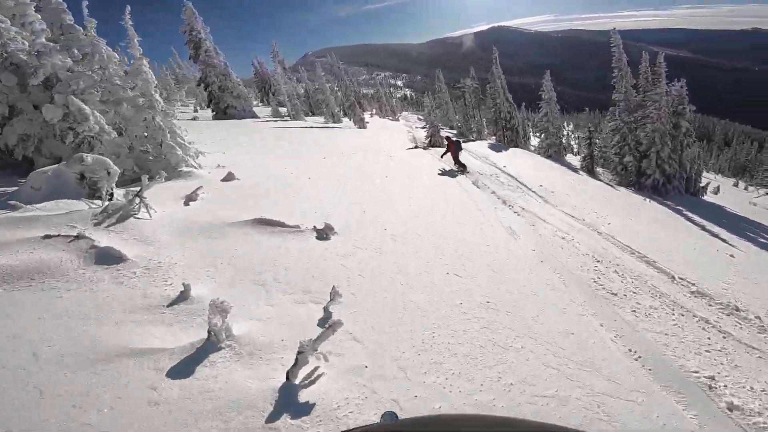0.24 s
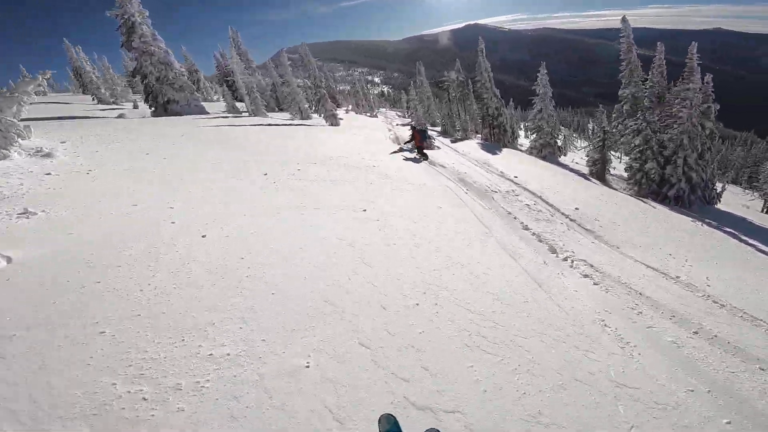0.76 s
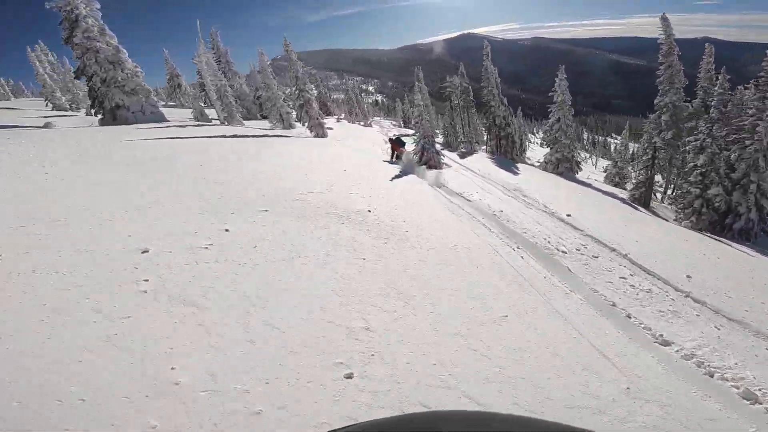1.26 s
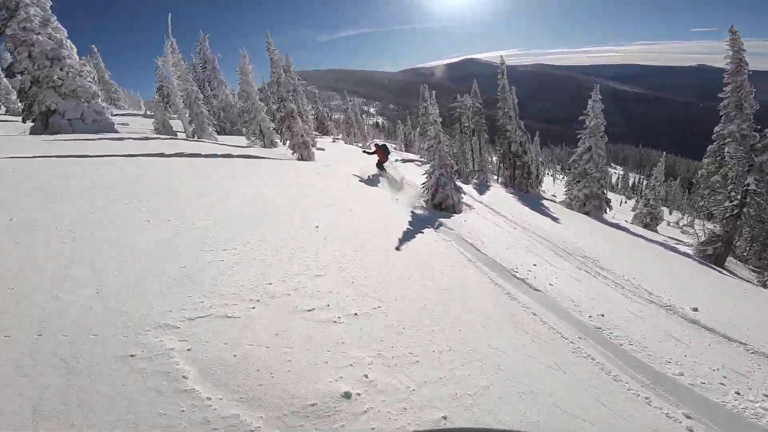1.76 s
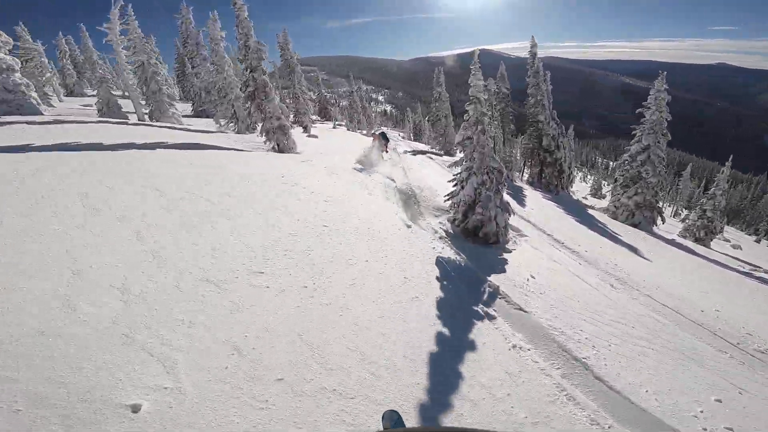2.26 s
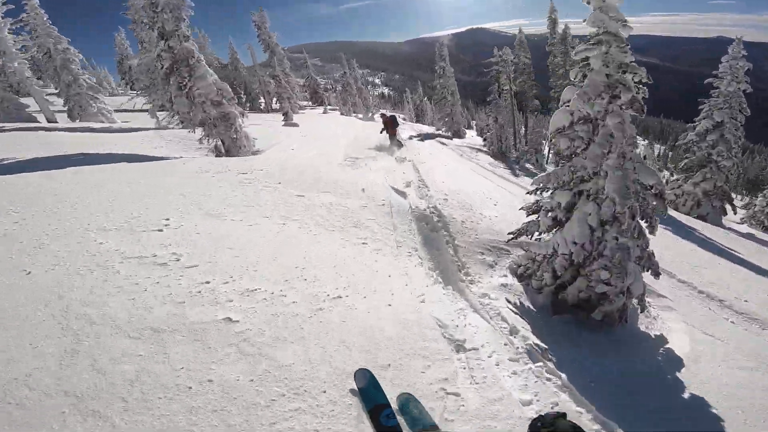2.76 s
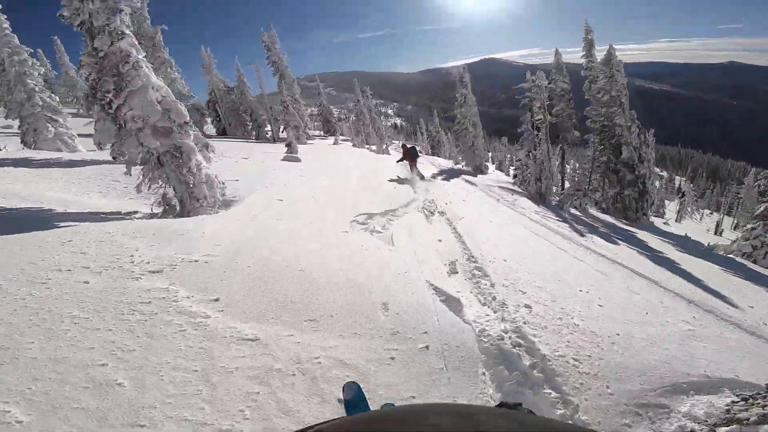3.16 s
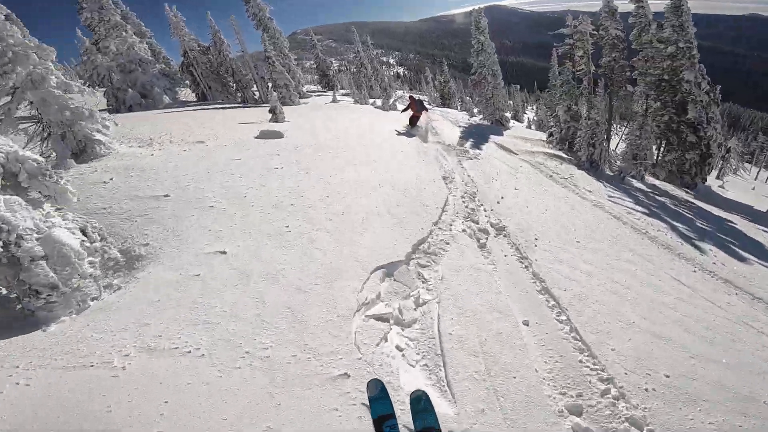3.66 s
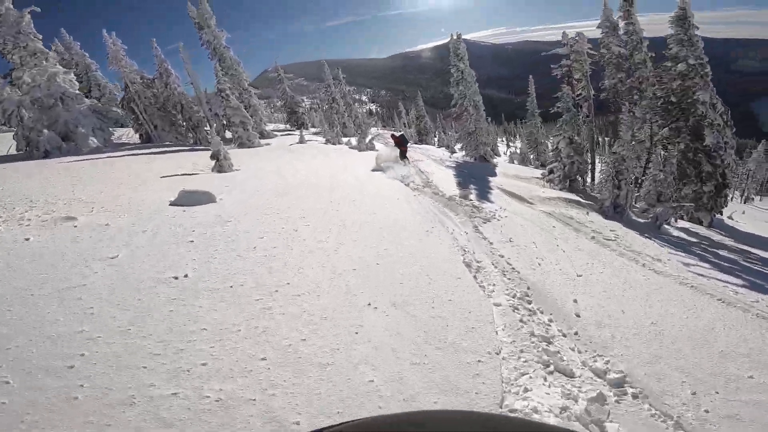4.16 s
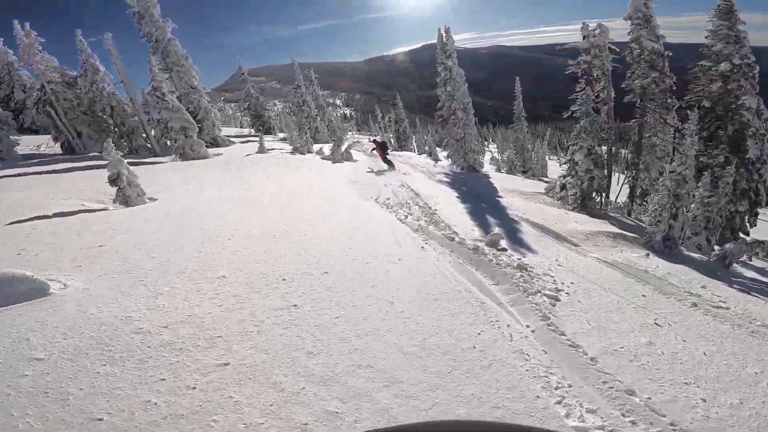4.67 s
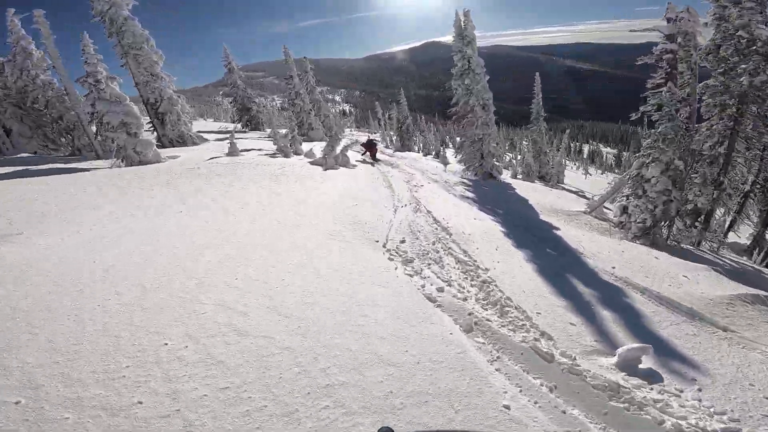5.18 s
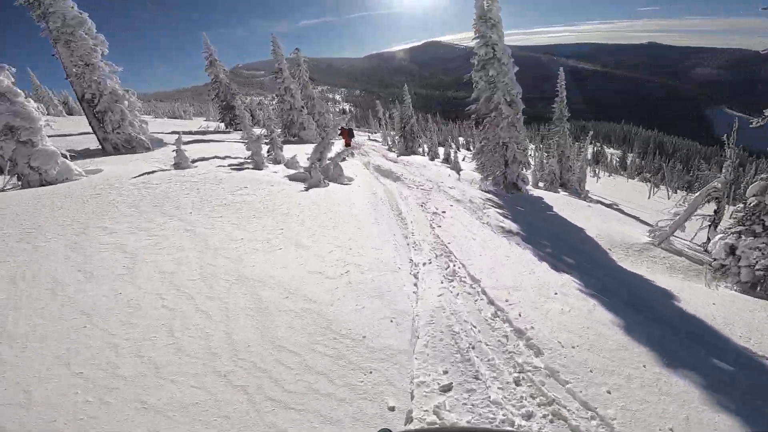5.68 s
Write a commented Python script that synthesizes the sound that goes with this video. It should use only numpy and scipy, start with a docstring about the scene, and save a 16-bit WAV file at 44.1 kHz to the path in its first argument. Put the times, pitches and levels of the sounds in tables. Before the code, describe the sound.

Fast skiing heard from the helmet: buffeting wind gusts, a bright snow hiss that swells and thins, then small ice clicks and bumps.

```python
"""Wind buffets and moans over the bright hiss of skis running down a powder slope; ice ticks and bumps follow.
The place is a helmet: a small camera with two microphone ports, worn by the skier.
Wind is noise in five bands, linked between the ports and driven by airflow, gusts, lulls and the skis' hiss.
Snow is friction noise with cracking crystals, coloured by the turn, the housing and swishes of thrown snow.
Ticks are short decaying tone pairs with a crackle; bumps are a falling low push and a deep thud."""
import sys
import numpy as np
from scipy import signal
from scipy.io import wavfile
from scipy.ndimage import uniform_filter1d

SR = 44100
rng = np.random.default_rng(int(sys.argv[2]) if len(sys.argv) > 2 else 0)


def int16_out(signal):
    """Quantize to a 16-bit WAV file."""
    q = np.round(np.clip(np.atleast_2d(signal).T, -1, 1) * 32767)
    wavfile.write(sys.argv[1], SR, q.astype(np.int16))


N = 261513
TIME = np.arange(N) / SR


def amp(db):
    """Amplitude factor of a level in dB."""
    return 10 ** (np.asarray(db) / 20)


def summed_db(*levels_db):
    """Level of unrelated sounds together: their powers add."""
    return 10 * np.log10(sum(amp(db) ** 2 for db in levels_db))


def evened(x):
    """Scales a signal to an effective value of one."""
    return x / np.sqrt(np.mean(abs(x) ** 2) + 1e-20)


def curves(rows, t, scale=np.asarray):
    """Straight lines through each column of a table, over its first column."""
    points, *columns = np.transpose(rows)
    return [np.interp(scale(t), scale(points), column) for column in columns]


def spectra(x, size):
    """Short overlapping spectra: their frequencies, times and values."""
    return signal.stft(x, SR, nperseg=size, noverlap=size - size // 4)


def sound(z, size):
    """Turns short spectra back into a waveform."""
    return signal.istft(z, SR, nperseg=size, noverlap=size - size // 4)[1][:, :N]


def bump(hz, centre_hz, width_hz):
    """Resonance curve that peaks at one and halves at the edges of its width."""
    return 1 / (1 + (2 * (hz - centre_hz) / width_hz) ** 2)


def patches(shape, bins, frames):
    """A smooth random field over frequency and time."""
    field = uniform_filter1d(rng.standard_normal(shape), max(round(bins), 1), axis=0)
    return evened(uniform_filter1d(field, max(round(frames), 1), axis=1))


def at_ports(z, hz, colour, link):
    """Colours two unrelated noises into a left and a right port, partly alike and shifted in phase."""
    left_db, right_db = curves(colour, hz[:, None], np.log1p)
    same, phase = curves(link, hz[:, None], np.log1p)
    shared = same * np.exp(1j * phase) * z[0]
    own = np.sqrt(1 - same ** 2) * z[1]
    return np.array([amp(left_db) * z[0], amp(right_db) * (shared + own)])


# Rush of air past the helmet, rising and falling with speed: time_s, roar_db
AIR_SPEED = [(0, -54.5), (1.05, -46), (2.65, -46), (2.85, -52), (3.4, -54.5), (3.65, -60.5), (4.1, -53),
             (4.7, -57), (5.0, -58), (5.93, -47.5)]
# Gusts that strike the ports: start_s, length_s, buffeting_db, moan_db
GUST_EVENTS = [(0.516, 0.045, -37, -40), (1.064, 0.34, -35.5, -47.5), (1.307, 0.38, -55, -30),
               (1.778, 0.17, -58, -35.5), (2.346, 0.018, -34.5, -50), (2.483, 0.36, -37.5, -36.5),
               (2.898, 0.14, -35, -58), (3.034, 0.065, -43, -33.5), (3.259, 0.086, -50, -40),
               (3.347, 0.041, -30.5, -40.5), (3.391, 0.098, -33, -44), (3.514, 0.11, -34, -47),
               (4.05, 0.17, -42.5, -42), (4.309, 0.12, -62, -37), (4.648, 0.3, -32, -59),
               (4.854, 0.18, -39.5, -43), (5.248, 0.11, -44, -36.5), (5.796, 0.19, -39.5, -44.5)]
# Lulls, when the head shields the ports: middle_s, length_s, buffeting_drop_db, moan_drop_db (below 0 lifts)
SHELTERED = [(0.316, 0.74, 4, 12.5), (1.447, 0.35, 7, -2.5), (3.173, 0.14, 5, 7), (3.785, 0.23, 6, 18),
             (4.6, 0.24, 9, 33), (5.603, 0.12, 12.5, 14.5)]
BUFFET_DB, BUFFET_FOLLOWS = -42.5, 0.12  # buffeting at a roar of -53 dB, and dB per dB of roar
MOAN_OVER_DB, GUST_ROAR_DB = 3, -17  # steady moan above the roar; roar in a gust against its moan
GUST_RISE_S, GUST_FALL_S = 0.017, 0.04  # seconds per 20 dB
GUST_SAG_DB_PER_S = 21  # steady weakening from the start of a gust


def airflow():
    """Levels of buffeting, moan and roar: they follow the speed; gusts add to them, lulls change the first two."""
    roar_db = curves(AIR_SPEED, TIME)[0]
    buffet_db = BUFFET_DB + BUFFET_FOLLOWS * (roar_db + 53.0)
    moan_db = roar_db + MOAN_OVER_DB
    for middle, length, buffet_drop_db, moan_drop_db in SHELTERED:
        shelter = np.exp(-(2 * (TIME - middle) / length) ** 2)
        buffet_db = buffet_db - buffet_drop_db * shelter
        moan_db = moan_db - moan_drop_db * shelter
    for start, length, gust_buffet_db, gust_moan_db in GUST_EVENTS:
        before = (start - TIME) / GUST_RISE_S
        after = (TIME - start - length) / GUST_FALL_S
        away_db = -20 * np.maximum(np.maximum(before, after), 0)
        away_db -= GUST_SAG_DB_PER_S * np.maximum(TIME - start, 0)
        buffet_db = summed_db(buffet_db, gust_buffet_db + away_db)
        moan_db = summed_db(moan_db, gust_moan_db + away_db)
        roar_db = summed_db(roar_db, gust_moan_db + GUST_ROAR_DB + away_db)
    return [buffet_db, moan_db, roar_db]


# Low range as the two ports hear it, before each band is levelled: frequency_hz, left_db, right_db
AIR_COLOUR = [(25.7, -2.5, 5.5), (69, -4.5, 7), (95.8, -8, 4), (128, -12, -15.5), (175, -24, -20.5),
              (233, -24.5, -15), (360, -33, -29), (466, -32.5, -30.5), (890, -31, -29)]
# How the housing links the ports in the low range: frequency_hz, likeness (0-1),
# phase of right against left (radians)
AIR_PORT_LINK = [(20, .93, .2), (60, .7, .7), (95, .92, 1.1), (160, .25, 0), (260, .75, -1.1),
                 (400, .35, -2.5), (560, .88, -3.1), (950, .8, -2.7)]
# Cavities that moan in the wind: centre_hz, width_hz, lift_db
CAVITIES = [(95.5, 17, 7), (819, 71, 6.5)]


def wind(patchy_db=0.57, lumpy_db=(1.5, 2.2, 2.1, 1.2, .6), rush_db=-9.0, scrape_db=-32, wander_share=0.063):
    """Turbulence at the ports: buffeting, moan and roar, then a rush and the low scrape of the skis."""
    hz, t, z = spectra(rng.standard_normal((2, N)), size=4096)
    # the lowest moan slides with the angle of the air
    wander = 1 + wander_share * patches((1, len(t)), 1, 6)
    lift_db = sum(bump(hz[:, None], centre * wander, width) * db for centre, width, db in CAVITIES[:1])
    lift_db = lift_db + sum(bump(hz[:, None], centre, width) * db for centre, width, db in CAVITIES[1:])
    uneven_db = patchy_db * patches(z.shape[1:], 4, 2)
    z = at_ports(z, hz, AIR_COLOUR, AIR_PORT_LINK) * amp(lift_db + uneven_db)

    air_db = airflow()
    pressure_db = hiss_db(TIME)
    rush = rush_db + 0.53 * pressure_db + 0.73 * air_db[2]  # grows with pressure and with speed
    scrape = scrape_db + 0.71 * pressure_db
    levels_db = air_db + [rush, scrape]
    # neighbouring low-pass curves differ by one band
    under = [0] + [1 / (1 + (hz / edge_hz) ** 8) for edge_hz in (50, 140, 430, 700, 1080)]
    out = 0
    for low, high, level_db, depth_db in zip(under, under[1:], levels_db, lumpy_db):
        part = sound(z * (high - low)[:, None], size=4096)
        lumps = patches((1, N), 1, 1900)[0]  # eddies a few hundredths of a second long
        gain = signal.oaconvolve(amp(level_db + depth_db * lumps), np.hanning(800) / 400, "same")
        out = out + gain * part / np.std(part.mean(0))
    return out


# Swishes of snow thrown by a ski: loudest_s, level_db, rise_s, fall_s, crispest_hz
THROWN_SNOW = [(.34, -55.5, 0.058, 0.15, 2510), (0.789, -50.5, 0.067, 0.053, 1910),
               (3.19, -49.5, 0.12, 0.097, 2230), (3.559, -53.5, 0.18, 0.15, 1860),
               (3.771, -57, 0.047, 0.09, 2480), (4.3, -58, 0.023, 0.18, 2440),
               (4.999, -63, 0.087, 0.078, 2730), (5.3, -56, 0.16, 0.045, 1295)]


def swishes_db(t):
    """Each swish swells and dies like a bell curve, with its own rise and fall."""
    return [db - 9 * ((t - peak) / np.where(t < peak, rise, fall)) ** 2
            for peak, db, rise, fall, _ in THROWN_SNOW]


# Pressure of the skis on the snow: time_s, hiss_db
SKI_PRESSURE = [(0, -59.5), (.5, -54), (.68, -51), (.93, -51), (.98, -46), (1.1, -43.5), (2.0, -42.5),
                (2.3, -49.5), (2.61, -48.5), (3.02, -54), (3.37, -54), (3.415, -64.5), (3.43, -56.5),
                (4.0, -55.5), (4.68, -60), (5.05, -57.5), (5.4, -55.5), (5.82, -49), (5.93, -43.5)]


def hiss_db(t):
    """Level of the gliding skis plus the swishes."""
    return summed_db(curves(SKI_PRESSURE, t)[0], *swishes_db(t))


# Course of the turn: time_s, share of loose spray against edge carving (0-1), treble_db
TURN_COLOUR = [(0, 0.33, 0), (.95, 0.2, -3), (1.14, 0.03, -2.5), (1.17, .15, -13), (1.21, 0.08, -5),
               (2.15, 0.13, -2), (2.35, 0.59, -6.5), (2.8, 0.69, 1.5), (3.2, 0.6, 3.5), (3.7, 0.72, 3.5),
               (4.0, 0.48, 1.5), (4.7, 0.6, 3.5), (5.6, 0.39, -4), (5.93, 0, -3)]
# Edge carving as the two ports hear it, before levelling: frequency_hz, left_db, right_db
CARVE_COLOUR = [(910, -18, -6), (1340, -5.5, -1.5), (1590, -5, -6), (2128, 5.5, 3), (2477, -4.5, -14.5),
                (3060, -2, -12.5), (3440, -13, -14.5), (4200, -10, -14), (4480, -10.5, -20.5),
                (5050, -6.5, -13.5), (5660, -14, -15), (6700, -19.5, -26), (7500, -35, -29),
                (8800, -66, -60.5), (11100, -81.5, -70)]
# Loose spray as the two ports hear it, before levelling: frequency_hz, left_db, right_db
SPRAY_COLOUR = [(970, -10.5, -17), (1297, -3, 1.5), (1980, -1, -1), (2420, -14.5, 3), (3310, -6, -1.5),
                (3640, -13, -15), (4040, -19, -7), (4570, -14.5, -15.5), (5300, -2.5, 0.5),
                (6800, -9.5, -8.5), (7560, -9.5, -15), (8460, -27, -24), (11400, -45, -51)]
# How the housing links the ports in the snow's range: frequency_hz, likeness (0-1),
# phase of right against left (radians)
SNOW_PORT_LINK = [(950, .8, -2.7), (1080, .3, -4.5), (1200, .8, -5.6), (1500, .4, -6.8), (1900, .65, -7.3),
                  (2300, .65, -11.8), (2700, .4, -12.6), (3000, .6, -15.5), (4100, .4, -18),
                  (4650, .92, -21.7), (5000, .5, -22.9), (5500, .85, -21.4), (7500, .45, -21.6),
                  (8600, .2, -25)]
# Housing resonances that the hiss excites: centre_hz, width_hz, carving_lift_db, spray_lift_db
HOUSING_RESONANCES = [(1178.5, 82, 14.5, 8.5), (1840, 150, -2.5, 8), (2585, 160, 4, 3.5),
                      (4315, 120, 10, 7), (4940, 300, 7, -11.5), (6190, 230, -5.5, 8)]


def snow(crystals_per_s=2500, spread_db=1.0, grit_db=-5, patchy_db=1.13, flicker_db=0.82, restless_db=-0.5):
    """A bed of fine friction noise with single crystals cracking in it, coloured by the turn and the housing."""
    struck = rng.random(N) < crystals_per_s / SR
    sizes = amp(spread_db * np.minimum(rng.exponential(1, N), 4)) * struck
    cracks = evened(sizes) * rng.standard_normal((2, N))
    hz, t, z = spectra(rng.standard_normal((2, N)) + amp(grit_db) * cracks, size=1024)

    spray_share, treble_db = curves(TURN_COLOUR, t)
    spray_share = np.clip(spray_share, 0, 1)
    body = (hz > 1000) & (hz < 3200)
    low_cut = 1 / (1 + (1030 / (hz[:, None] + 1)) ** 12)
    # each resonance comes and goes
    excited = [restless_db * patches((1, len(t)), 1, 14) for _ in HOUSING_RESONANCES]
    mix = 0
    for lift_column, colour, share in ((2, CARVE_COLOUR, 1 - spray_share), (3, SPRAY_COLOUR, spray_share)):
        lift_db = sum((row[lift_column] + drive_db) * bump(hz, *row[:2])[:, None]
                      for row, drive_db in zip(HOUSING_RESONANCES, excited))
        ports = at_ports(z, hz, colour, SNOW_PORT_LINK) * amp(lift_db) * low_cut
        mix = mix + share * ports / np.std(ports.mean(0)[body])
    mix = mix / np.sqrt(spray_share ** 2 + (1 - spray_share) ** 2)

    treble = 1 / (1 + (3300 / (hz + 1)) ** 8)
    treble_db = treble_db + 0.54 * (hiss_db(t) + 49.0)  # harder pressure sounds brighter
    field_db = treble[:, None] * treble_db + patchy_db * patches(z.shape[1:], 12, 10)
    glide_db = curves(SKI_PRESSURE, t)[0]
    for swish_db, row in zip(swishes_db(t), THROWN_SNOW):  # thrown snow is crisper than the glide
        added_db = summed_db(glide_db, swish_db) - glide_db
        field_db += 1.1 * added_db * bump(hz, row[-1], width_hz=600)[:, None]
    field_db += flicker_db * patches((1, len(t)), 1, 3)  # uneven snow shakes all bands at once
    hiss = sound(mix * amp(field_db), size=1024)
    return amp(hiss_db(TIME)) * hiss / np.std(hiss.mean(0))


KNOCK_LENGTH = 4000  # samples
KNOCK_TIME = np.arange(KNOCK_LENGTH) / SR


def tone_pair(hz, ratio):
    """Two sine modes, the upper one at half strength."""
    return np.sin(2 * np.pi * hz * KNOCK_TIME) + .5 * np.sin(2 * np.pi * ratio * hz * KNOCK_TIME)


# Ice ticks on ski and binding, levels before the port balance: start_s, ring_db, ring_hz, snap_db, snap_hz
ICE_TICKS = [(3.425, -42.5, 1800, -62, 4200), (4.147, -42, 1450, -59, 4570),
             (4.3005, -45, 3160, -44.5, 5260), (4.356, -64, 1840, -49, 6200),
             (4.421, -39, 1980, -45.5, 5200), (4.5986, -44, 1450, -64, 4050),
             (4.6125, -40.5, 1550, -56, 4250), (4.786, -37, 1540, -59, 4340)]


def ticks():
    """Ice striking ski and binding: a short ring, a bright snap and a crackle of crumbling crust."""
    out, t = np.zeros((2, N + KNOCK_LENGTH)), KNOCK_TIME
    for start, ring_db, ring_hz, snap_db, snap_hz in ICE_TICKS:
        ring_shape = amp(ring_db - 60 * t / 0.019) * (1 - np.exp(-t / 0.00053))
        ring = ring_shape * tone_pair(ring_hz, 1.22)
        splinter = np.exp(-((t - .0012) / 0.0006) ** 2)  # about a millisecond long
        grains = uniform_filter1d(patches((1, KNOCK_LENGTH), 1, 30) ** 2, size=20)
        crumbs = amp(-20 - 60 * t / 0.059) * grains
        snap = amp(snap_db) * (splinter + crumbs) * tone_pair(snap_hz, 1.27)
        out[:, round(start * SR):][:, :KNOCK_LENGTH] += amp([[-1.5], [1.5]]) * (ring + snap)
    return out[:, :N]


# Bumps of the helmet, levels before the attack and port balance: start_s, level_db, starting_pitch_hz
HELMET_BUMPS = [(4.0488, -28.5, 205), (4.118, -25.5, 225)]


def bumps():
    """The bumped helmet gives a low push that falls in pitch and leaves a deep thud."""
    out, t = np.zeros((2, N + KNOCK_LENGTH)), KNOCK_TIME
    for start, db, hz in HELMET_BUMPS:
        turns = hz * (t - 14 * t ** 2)
        wave = np.sin(2 * np.pi * turns + [[1.], [0]])  # the left port leads by a radian
        push = amp(db - 9 * (t / .008) ** 2) * np.minimum(t / .0035, 1) ** 2 * wave
        thud_shape = amp(db - 6 - 60 * t / .12) * np.minimum(t / .008, 1)
        thud = -thud_shape * np.sin(2 * np.pi * 78 * t)
        out[:, round(start * SR):][:, :KNOCK_LENGTH] += amp([[-6.5], [3]]) * (push + thud)
    return out[:, :N]


def scene():
    """Wind, snow, ice ticks and helmet bumps together at the two ports."""
    return wind() + snow() + ticks() + bumps()


EDGE_HZ = 12900  # upper band limit


def record(dry):
    """The small microphones lose the top treble and add their own faint hiss; then the band limit."""
    soft = signal.sosfilt(signal.butter(2, 9000, fs=SR, output="sos"), dry)
    hiss = signal.sosfilt(signal.butter(2, 7000, fs=SR, output="sos"), rng.standard_normal(dry.shape))
    soft = soft + amp(-76.0) * hiss
    band_limit = signal.firwin(511, EDGE_HZ, window=("kaiser", 9), fs=SR)
    return signal.oaconvolve(soft, band_limit[None], "same")


dry = scene()
out = record(dry)
int16_out(out)
```